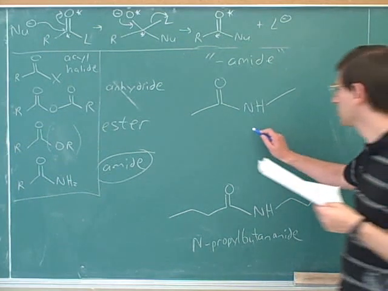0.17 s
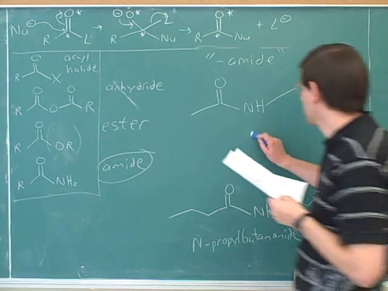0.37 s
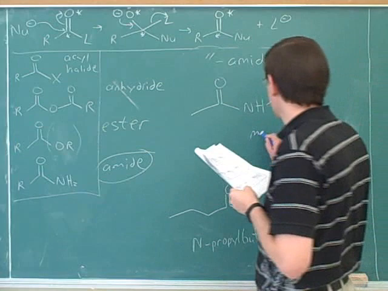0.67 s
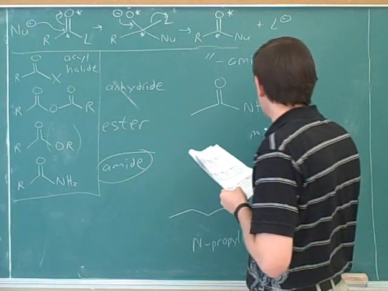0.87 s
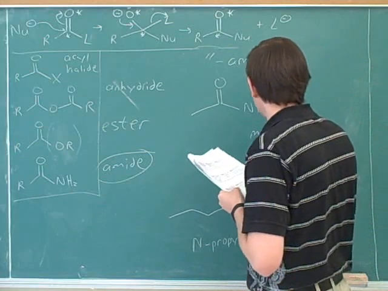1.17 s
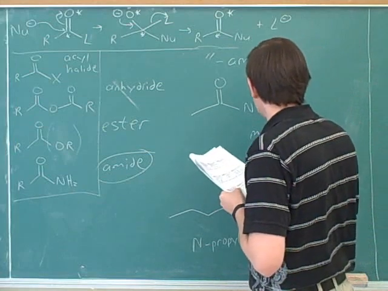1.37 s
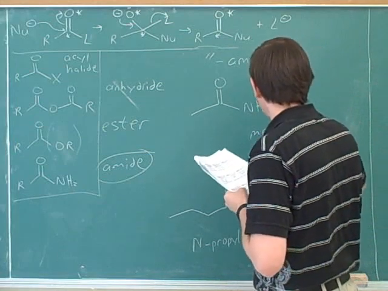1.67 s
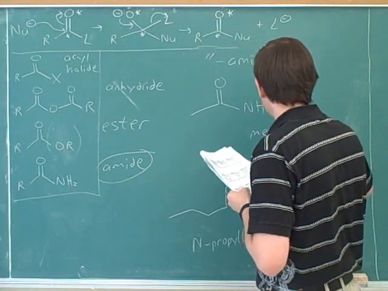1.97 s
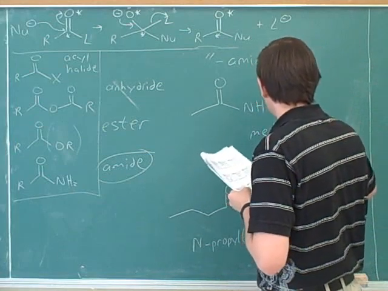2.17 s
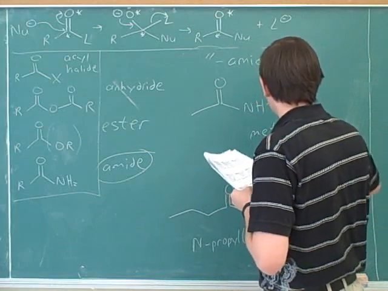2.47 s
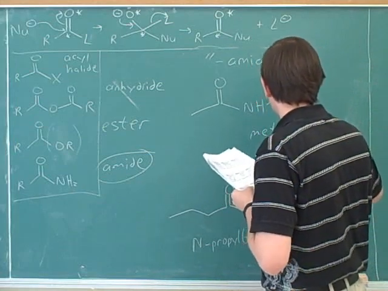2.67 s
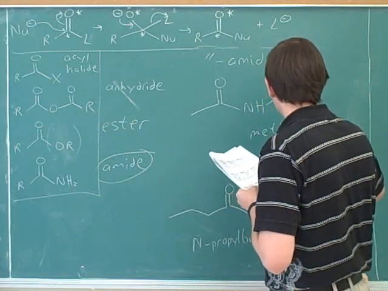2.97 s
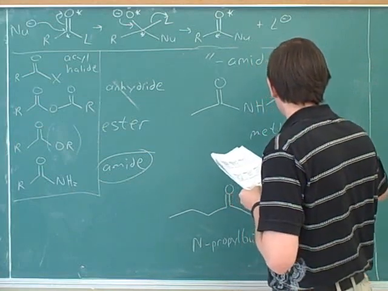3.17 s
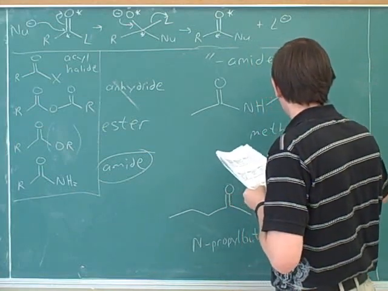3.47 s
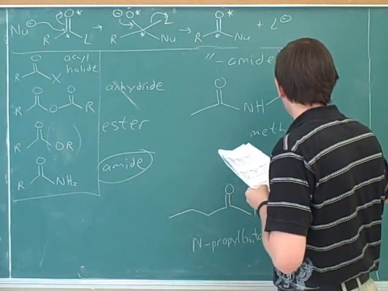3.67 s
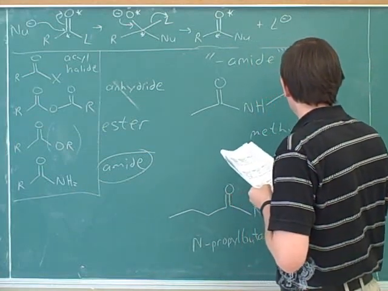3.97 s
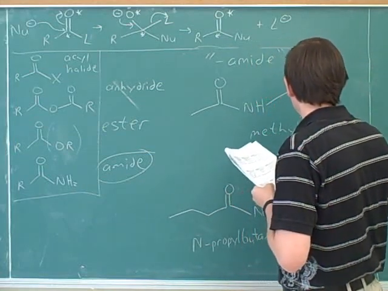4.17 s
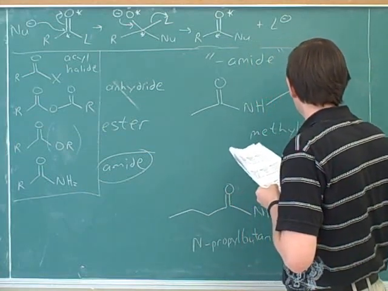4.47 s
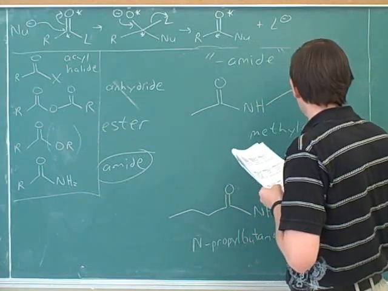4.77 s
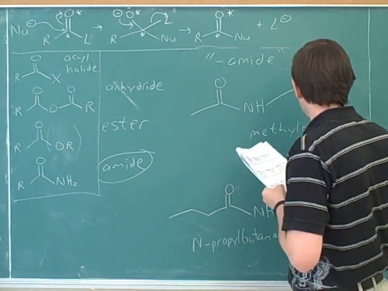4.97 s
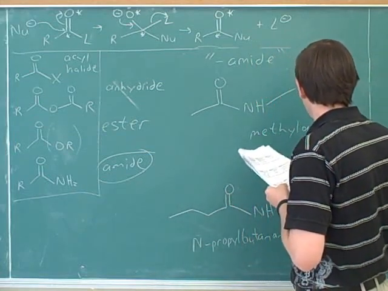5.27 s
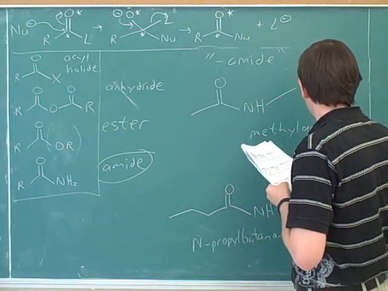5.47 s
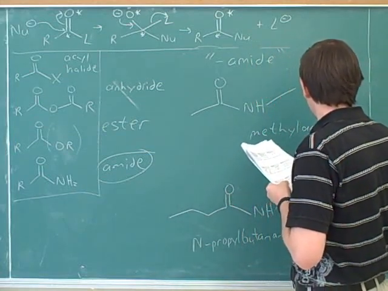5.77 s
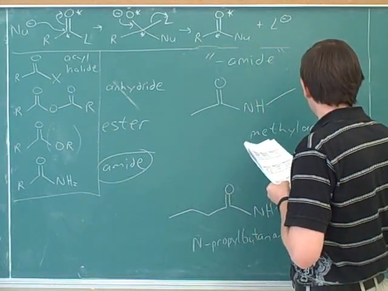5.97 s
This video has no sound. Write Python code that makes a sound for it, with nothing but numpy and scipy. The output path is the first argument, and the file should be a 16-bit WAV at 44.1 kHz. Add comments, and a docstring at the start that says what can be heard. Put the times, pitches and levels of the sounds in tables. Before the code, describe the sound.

A few metres from a camera microphone in a bare classroom, a chalk stick writes on a wall blackboard. After the fading echo of an earlier tap, sixteen crisp, hollow knocks come at irregular intervals, with faint dry drags between some. Tiny crumbs snap midway, and two quick taps close it. Low ventilation rumble continues underneath.

```python
"""A word is chalked on a wall blackboard, a few metres from a camera microphone in a bare classroom.
It opens on the dying room tail of a tap, over a low ventilation rumble (shaped noise) and faint hum.
From 0.4 s eight faint drags (noise slips swelling with each stroke) fall among sixteen taps: each tap
clicks, shakes the panel, rings the stick, crushes its tip and dies away in the room (noise and sines).
Two crumbs snap off near 2.4 s; the last long drag, at 5.5 s, leads to two closing taps."""
import sys
import numpy as np
from scipy import signal
from scipy.fft import rfft, irfft
from scipy.io import wavfile

SR = 44100
rng = np.random.default_rng(int(sys.argv[2]) if len(sys.argv) > 2 else 0)


def store_pcm(level_fs):
    """Save levels as 16-bit WAV."""
    pcm = np.round(np.clip(level_fs, -1, 1) * 32767).astype(np.int16)
    wavfile.write(sys.argv[1], SR, np.atleast_2d(pcm).T)


N = 269539
TIME = np.arange(N) / SR  # seconds through the whole scene
RING = np.arange(int(.9 * SR)) / SR  # seconds after one blow


def taps(click_db=-11.5, panel_db=-4.0, modes_db=-4.0, stick_db=-19.5, room_db=0, snap_db=-24,
         panel_t60=0.084, bounce_s=0.0062, bounce=1.13, build_s=0.0041, alike=0.55,
         echo_s=.048, echo=0.18):
    """Each touch-down excites click, panel, stick, tip and room, all coloured by how the tip lands."""
    # chalk touch-downs: start_s, strength_db, hardness_db, stick_lower_resonance_hz
    touch_downs = [(-.18, -5, 0, 2770), (0.4994, -5, -2.3, 2220), (1.0122, -4.5, -1, 2800),
                   (1.401, 0.2, -5.5, 3950), (1.6955, .5, 4, 4050), (1.8962, -.5, 0, 3660),
                   (2.2546, 0, -1, 2580), (2.429, -1, -2, 2060), (2.6912, 0.5, 6, 4500),
                   (3.1255, -1.5, -3, 2600), (3.77, -1.5, 2, 3640), (4.4305, -2, -0.5, 2660),
                   (4.8427, 0, 4.5, 3400), (5.0775, 1.5, -2, 2870), (5.2487, -0.76, 3.5, 3250),
                   (5.9194, -1.5, 2, 3160), (6.0715, -1, 4.5, 3540)]
    # the panel's dense short rattle: frequency_hz, relative_level_db
    panel_curve = [(150, -10), (300, -12.5), (450, -33), (680, 4.5), (780, 3), (1060, 1), (1400, 3),
                   (2100, 6.5), (3000, 4), (4000, -3.5), (4800, -8), (7000, -9), (8800, -15.5),
                   (15500, -23.5)]
    # the panel's sound after the walls: frequency_hz, relative_level_db
    wall_curve = [(150, 4.5), (300, 3.5), (450, 10.5), (680, 7), (780, 10.5), (1060, 12), (1400, 6),
                  (2100, 9.5), (3000, 3.5), (4000, -1.5), (4800, -7.5), (7000, -10.5), (8800, -16.5),
                  (15500, -21)]
    out = np.zeros(N)
    shared_paths = rng.standard_normal((2, len(RING)))

    # the rattle swells again when the first reflection arrives
    rattle = fade(panel_t60, 0.00122) + bounce * fade(panel_t60 / 2, bounce_s)
    build = 1 - np.exp(-np.maximum(RING - bounce_s, 0) / build_s)
    build = build + echo * fade(0.079, echo_s)  # the far wall answers

    for s, strength_db, hard_db, low_hz in touch_downs:
        high_hz = stick_upper_hz(hard_db)
        # neighbouring spots on the board share part of their paths to the microphone
        own_paths = rng.standard_normal(shared_paths.shape)
        near, far = np.sqrt(alike) * shared_paths + np.sqrt(1 - alike) * own_paths
        sound = undb(click_db) * click()
        sound += undb(modes_db) * panel_modes()
        sound += undb(stick_db) * stick(high_hz)
        sound += undb(snap_db) * snap()
        sound += undb(panel_db) * unit(colour(near * rattle, panel_curve))
        sound += undb(room_db) * unit(colour(reverberate(far) * build, wall_curve))
        add(out, s, undb(strength_db) * colour(sound, contact(s, hard_db, low_hz, high_hz)))
    return out


def stick_upper_hz(hard_db, medium_hz=6580, rise_per_db=0.019):
    """A harder landing raises the stick's upper resonance, by a share per dB of hardness."""
    return medium_hz * (1 + rise_per_db * hard_db)


def contact(s, hard_db, low_hz, high_hz, knock_hz=1055, low_width=0.13, high_width=0.36, low_db=3.5):
    """Colour one blow (Hz, dB): its time sets the knock, its hardness the crack and upper ring."""
    # where strength, hardness and crack act: frequency_hz
    landing_hz = [1240, 3640, 11200]
    # the panel's knock as the hand moves along the word: time_s, level_db
    knock_course = [(.5, -2.5), (1, 1.5), (2.6, 1.5), (3.1, -3.5), (6.1, -2)]
    hz = np.geomspace(100, 16000, 400)
    # a harder landing cracks the tip more and damps the stick's upper resonance
    crack_db = 1.3 + 1.57 * hard_db
    high_db = 4.0 - 0.37 * hard_db
    db = lookup(hz, np.c_[landing_hz, [0, hard_db, crack_db]])
    db += np.interp(s, *np.transpose(knock_course)) * bell(hz, knock_hz, .11)
    db += low_db * bell(hz, low_hz, low_width)
    db += high_db * bell(hz, high_hz, high_width)
    return np.c_[hz, db]


def click(push_s=.000083, mirror_s=0.00527, mirror=0.36, soften=1.1):
    """The pressure pulse straight from the point of contact, then its duller first reflection."""
    direct = RING / push_s
    late = np.maximum(RING - mirror_s, 0) / (soften * push_s)
    return unit(direct * np.exp(-direct) + mirror * late * np.exp(-late))


def panel_modes(scatter_db=3.0):
    """The panel rings in decaying sines; each spot on the board feeds them a little differently."""
    # the panel's strongest modes: frequency_hz, relative_level_db, t60_s
    mode_list = [(29.4, -1, 0.93), (116.5, -7, 0.22), (184.4, -18.5, 1), (240.1, -10.5, 0.67),
                 (273.5, -9, 0.55), (390.6, -10.5, 0.85), (444, -11.5, 1), (529, -10.5, 1), (567, -7, 0.25),
                 (744.4, 1, 0.25), (788, -3.5, 0.32), (853, -1.5, 0.23), (976, 3.5, 0.11),
                 (1045.5, 6.5, 0.15), (1055, 9, 0.085), (1197, -2, 0.19), (1635, -9, 0.11),
                 (2020, -3.5, 0.15), (2200, -1, 0.14), (2580, 6, 0.1), (2920, -7, 0.12), (3184, -6, 0.39)]
    sizes = undb(scatter_db * rng.standard_normal(len(mode_list)))
    phases = rng.uniform(0, 2 * np.pi, len(mode_list))
    ring = np.zeros(len(RING))
    for (hz, db, t60), size, phase in zip(mode_list, sizes, phases):
        ring += undb(db) * size * np.sin(2 * np.pi * hz * RING + phase) * fade(t60)
    return unit(ring)


def stick(hz, t60=0.015, delay=0.0019, spread=0.059):
    """The chalk stick's short ring, a cluster of three close modes."""
    pitches = hz * (1 + spread * rng.standard_normal(3))
    return unit(sum(np.sin(2 * np.pi * f * (RING - delay)) * fade(t60, delay) for f in pitches))


def snap(t60=0.022, delay=0.00089, edge_hz=8000):
    """The tip crushes: a brief burst of bright grit."""
    grit = rng.standard_normal(len(RING)) * fade(t60, delay)
    return unit(signal.sosfilt(signal.butter(2, edge_hz, "high", fs=SR, output="sos"), grit))


def scraping(grain_db=4.5, patchy_db=2.4, patch_s=0.0055, wet_db=-3):
    """Tiny uneven slips of the tip swell and fade with each stroke; two crumbs snap; the room answers."""
    # chalk friction: frequency_hz, relative_level_db
    friction_curve = [(400, -2), (1500, -7), (3000, -5.5), (4500, -6.5), (6800, 0.5), (9000, -3.5),
                      (12000, -6.5), (15500, -9)]
    # crumbs breaking off the tip: start_s, level_db (before the room is mixed in)
    crumb_snaps = [(2.3548, -28), (2.3646, -27)]
    # the tip meets rougher and smoother patches of the board
    patches = np.interp(TIME / patch_s, np.arange(N), rng.standard_normal(N))
    unevenness_db = grain_db * rng.standard_normal(N) + patchy_db * patches
    slips = rng.standard_normal(N) * undb(unevenness_db)
    slips = unit(colour(slips, friction_curve)) * np.sqrt(N)  # RMS of one
    close = slips * strokes()
    for s, db in crumb_snaps:
        crumb = rng.standard_normal(len(RING)) * fade(.004)
        add(close, s, undb(db) * unit(colour(crumb, friction_curve)))
    tail = unit(reverberate(rng.standard_normal(len(RING))))
    wet = undb(wet_db) * signal.fftconvolve(close, tail)[:N]
    return (close + wet) / np.hypot(1, undb(wet_db))


def strokes(ease_db_per_s=11, speed_power=0.62):
    """The tip speeds up and slows in every stroke, while the hand lightens along each line."""
    # lines drawn without lifting the chalk: start_s, end_s, time_per_up_or_down_stroke_s,
    # initial_level_db (before easing and the room mix)
    drawn_lines = [(.42, .5, 0.089, -65), (0.601, .945, .085, -60), (1.137, 1.29, 0.07, -61),
                   (1.42, 1.6, 0.087, -63.5), (2.05, 2.219, 0.076, -71), (3.29, 3.52, 0.12, -64),
                   (4.575, 4.725, 0.072, -62), (5.51, 5.837, 0.084, -65)]
    out = np.zeros(N)
    for start, end, stroke_s, db in drawn_lines:
        t = TIME[TIME < end - start]
        speed = np.abs(np.sin(np.pi * t / stroke_s))
        # friction grows more slowly than the tip's speed
        add(out, start, speed ** speed_power * undb(db - ease_db_per_s * t))
    return out


def reverberate(noise, count=7):
    """Turn noise into a room tail: overlapping bands about an octave apart, each with its own decay."""
    # the room's reverberation time: frequency_hz, t60_s
    room_decay = [(150, 1), (450, 0.58), (1000, 0.38), (2500, 0.46), (6000, 0.48), (14000, 0.36)]
    centres = np.geomspace(room_decay[0][0], room_decay[-1][0], count)
    spectrum = rfft(noise)
    hz = np.arange(len(noise) // 2 + 1) * SR / len(noise)
    tail = np.zeros(len(noise))
    for centre_hz, band in zip(centres, np.eye(count)):
        share = lookup(hz, np.c_[centres, band])
        tail += irfft(spectrum * share, len(noise)) * fade(lookup(centre_hz, room_decay))
    return tail


def ventilation(air_db=-49, hum_hz=117, hum_db=-63):
    """Steady shaped noise for air rumble and microphone hiss, with a sine for a faint motor hum."""
    # ventilation and microphone hiss: frequency_hz, relative_level_db
    air_curve = [(12, -24), (27, -3), (42, -5.5), (78, -9), (110, -3), (150, -9.5), (190, -7.5),
                 (250, -15.5), (400, -20), (750, -27), (1500, -33.5), (2600, -39.5), (6300, -44.5),
                 (15500, -47)]
    noise = unit(colour(rng.standard_normal(N), air_curve)) * np.sqrt(N)  # RMS of one
    return undb(air_db) * noise + undb(hum_db) * np.sin(2 * np.pi * hum_hz * TIME)


def undb(db):
    """Decibels to gain."""
    return 10 ** (np.asarray(db) / 20)


def unit(x):
    """Scale to an energy of one."""
    return x / np.sqrt(np.sum(x ** 2))


def add(track, s, sound):
    """Mix a sound into a track from time s on, dropping what falls outside."""
    i = int(round(s * SR))
    start, end = max(i, 0), min(i + len(sound), len(track))
    track[start:end] += sound[start - i:end - i]


def lookup(hz, points):
    """Read (Hz, value) points on a log-frequency axis."""
    f, value = np.transpose(points)
    return np.interp(np.log(np.maximum(hz, 1)), np.log(f), value)


def colour(x, points, size=8192):
    """Causal minimum-phase filter with the given (Hz, dB) curve, made by folding its cepstrum."""
    hz = np.arange(size // 2 + 1) * SR / size
    cepstrum = irfft(np.log(undb(lookup(hz, points))))
    cepstrum[1:size // 2] *= 2
    cepstrum[size // 2 + 1:] = 0
    impulse = irfft(np.exp(rfft(cepstrum)))
    return signal.fftconvolve(x, impulse)[:len(x)]


def fade(t60, delay=0):
    """Exponential decay, 60 dB in t60 seconds, that begins after a delay."""
    return (RING >= delay) * np.exp(-np.log(1000) * np.maximum(RING - delay, 0) / t60)


def bell(hz, centre_hz, width):
    """A resonance peak of height one; the width is a share of its centre."""
    return 1 / (1 + (2 * np.log(hz / centre_hz) / width) ** 2)


def scene():
    """Taps, strokes and room air at one microphone."""
    return (taps() + scraping() + ventilation())[None]


def record(dry, top_hz=15800):
    """The camera cuts the top of the treble with a steep low-pass."""
    return signal.sosfilt(signal.ellip(10, .2, 80, top_hz, fs=SR, output="sos"), dry)


dry = scene()
out = record(dry)
store_pcm(out)
```